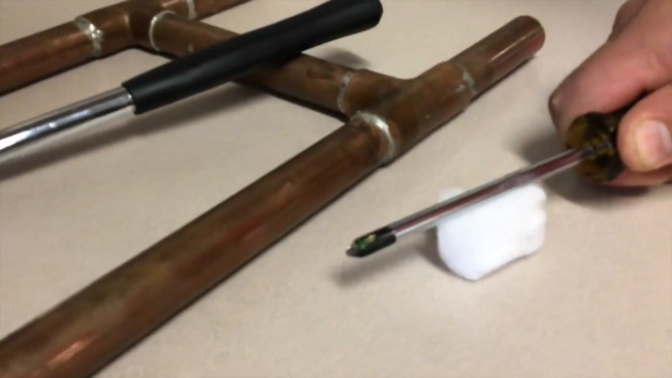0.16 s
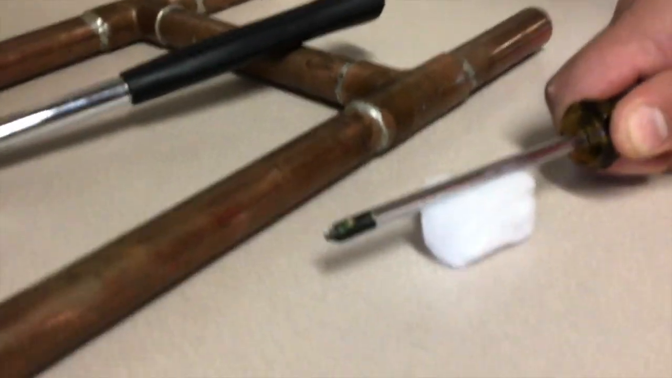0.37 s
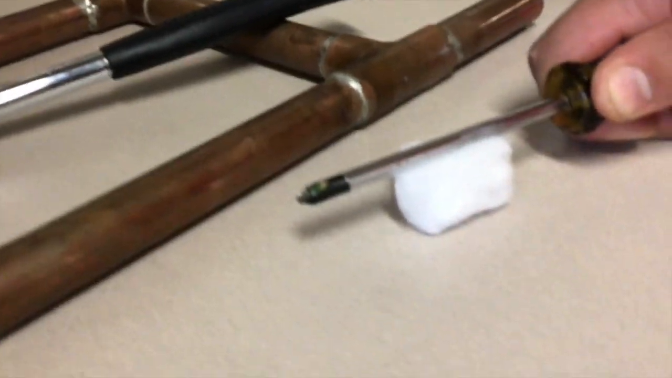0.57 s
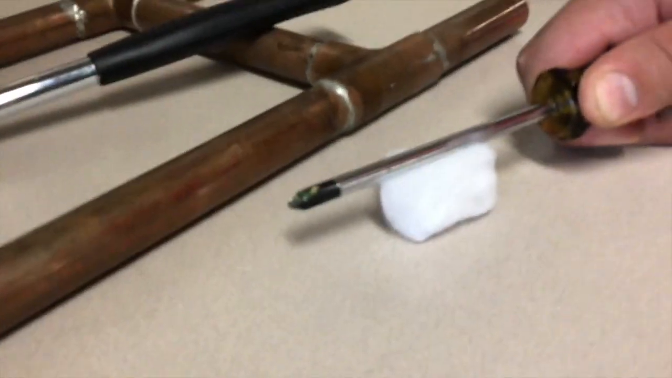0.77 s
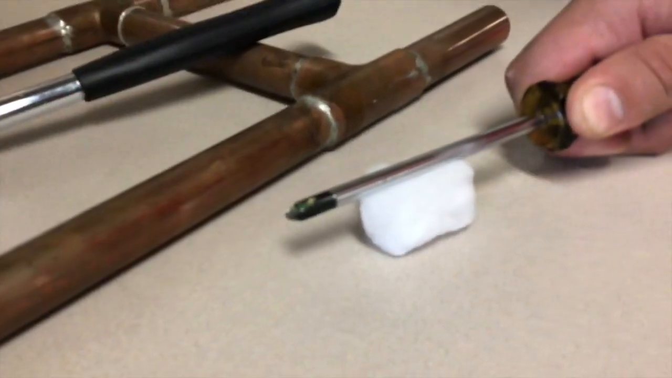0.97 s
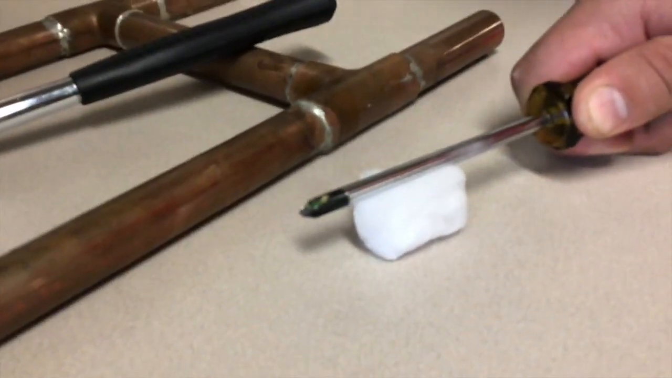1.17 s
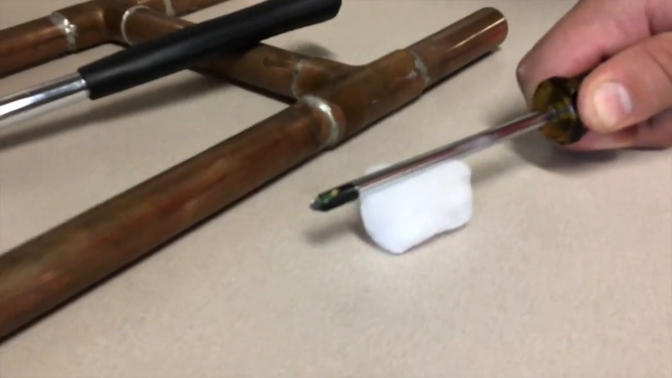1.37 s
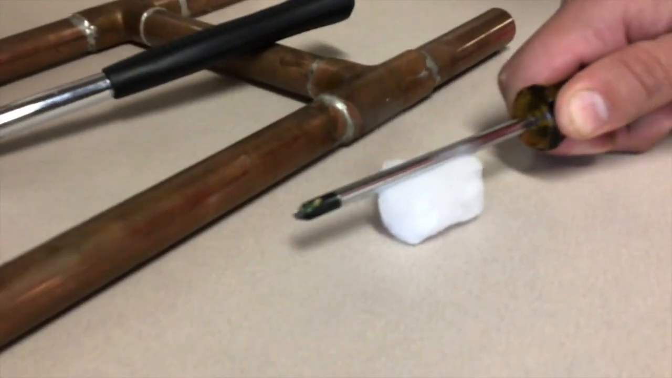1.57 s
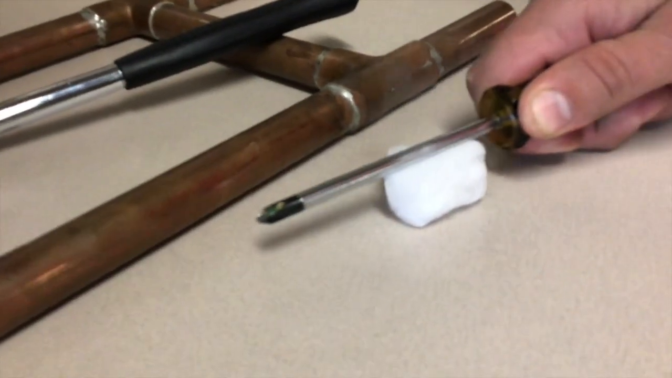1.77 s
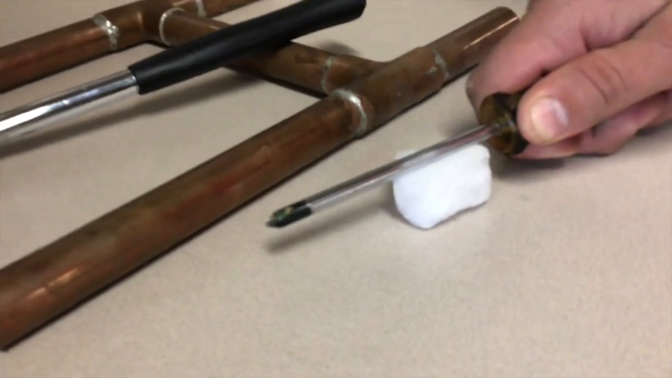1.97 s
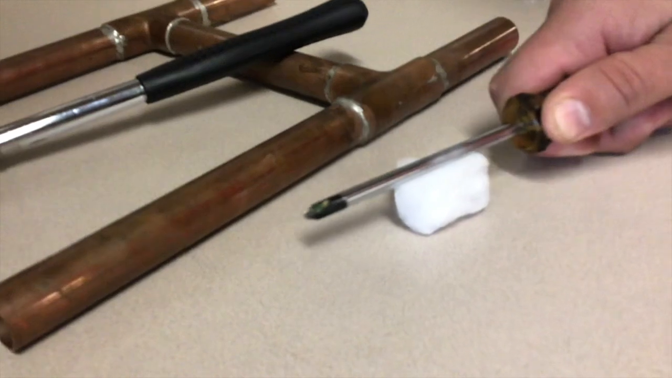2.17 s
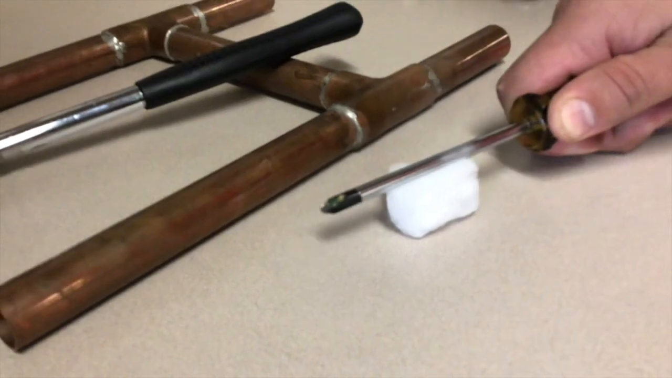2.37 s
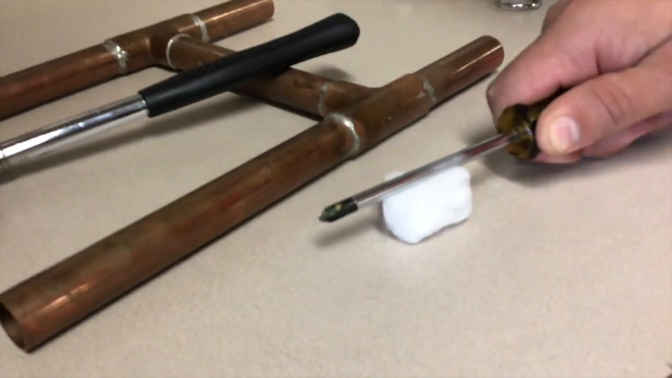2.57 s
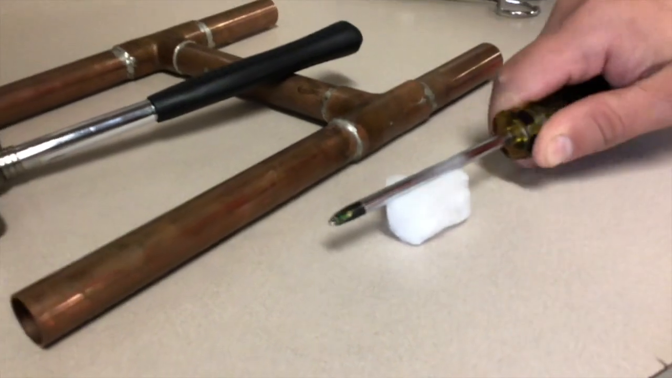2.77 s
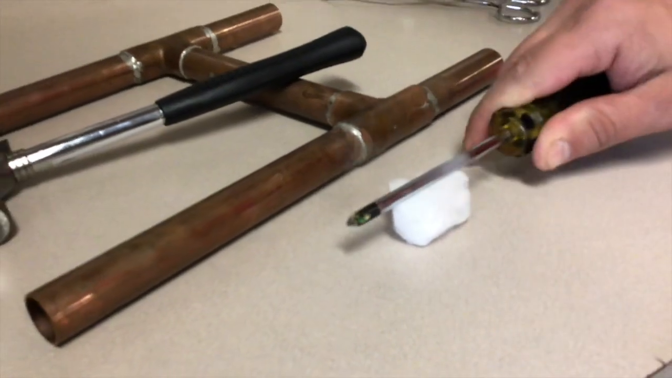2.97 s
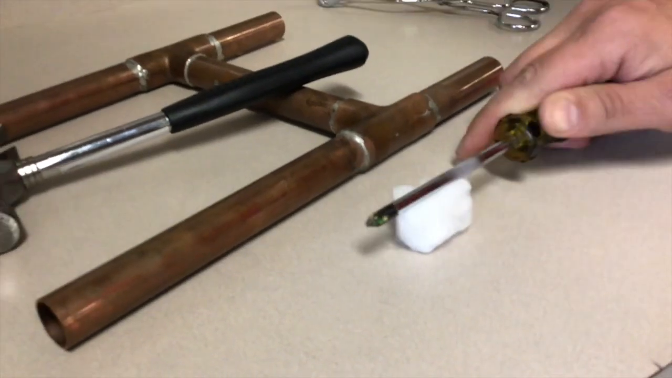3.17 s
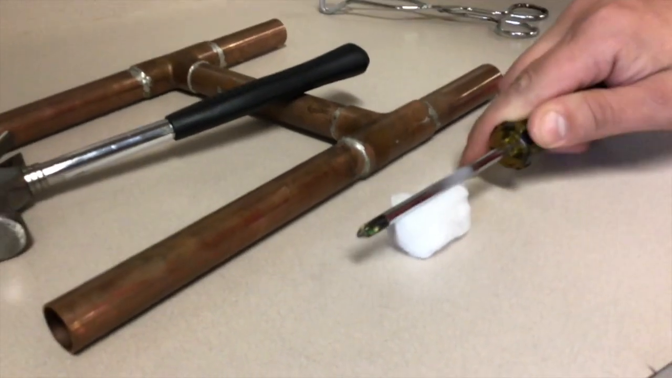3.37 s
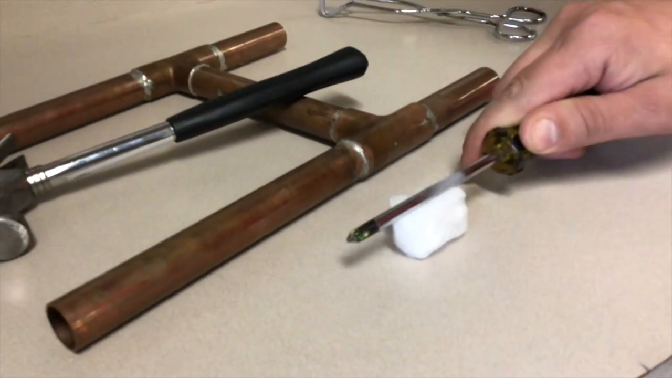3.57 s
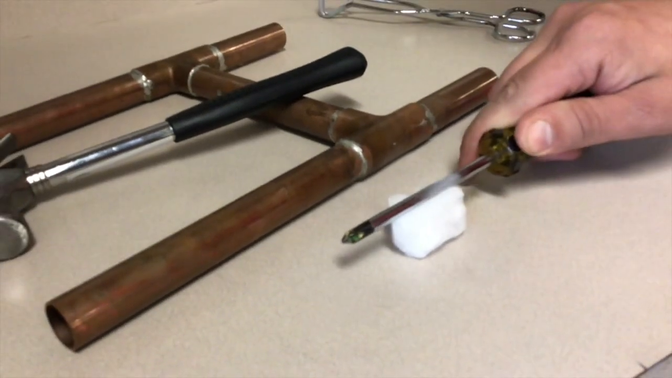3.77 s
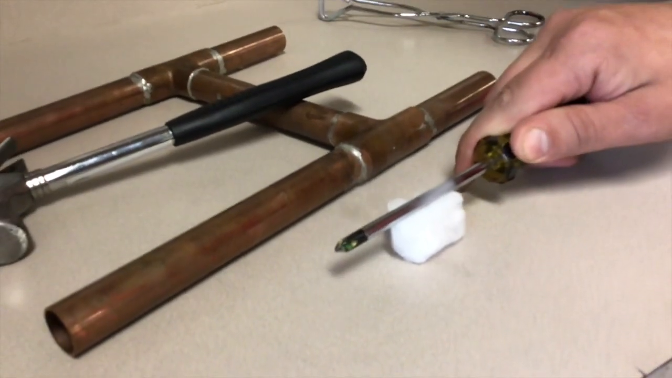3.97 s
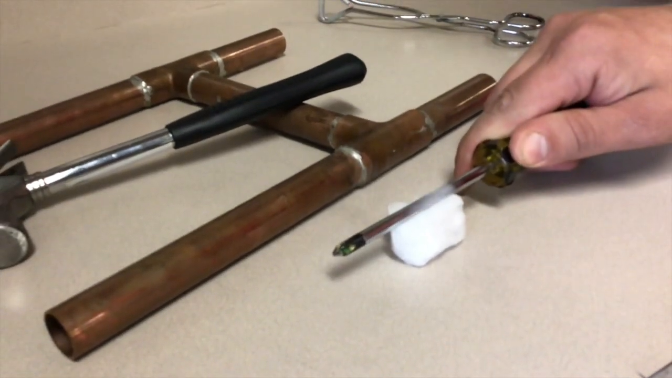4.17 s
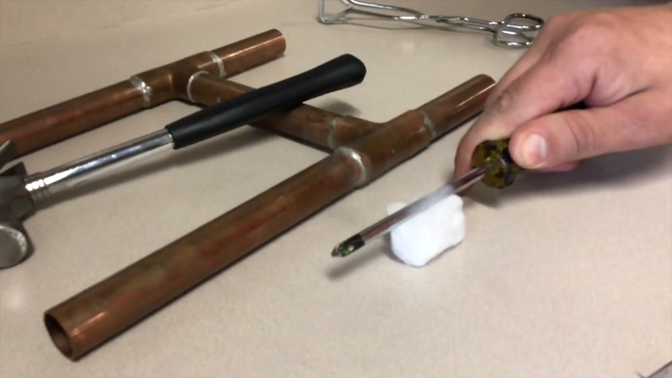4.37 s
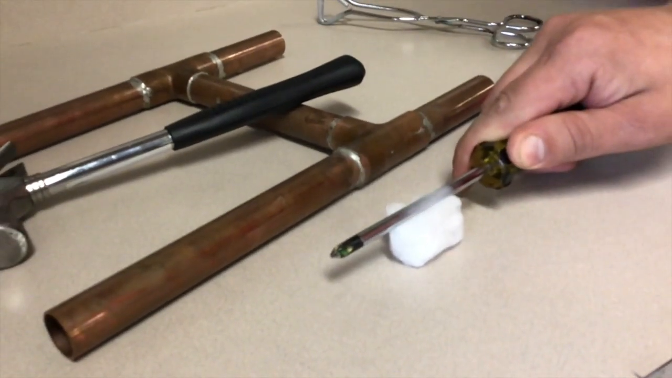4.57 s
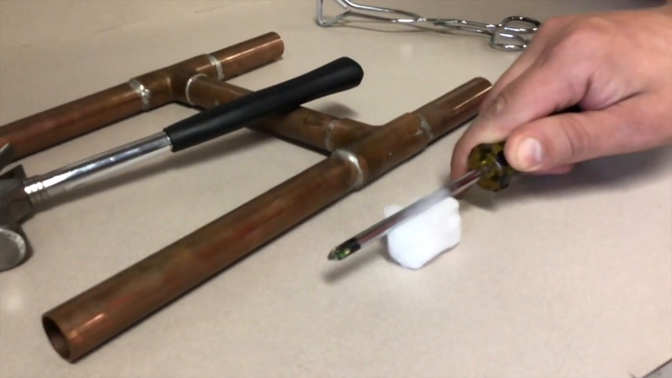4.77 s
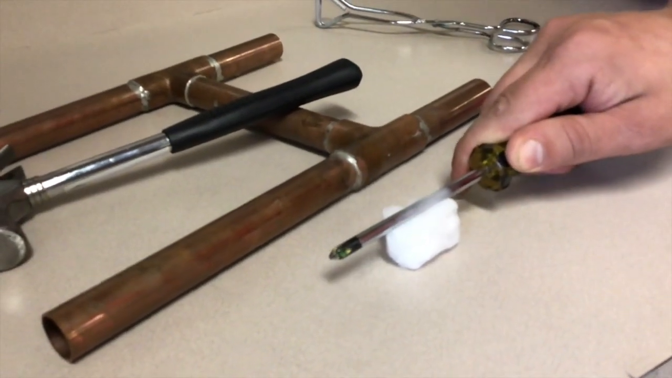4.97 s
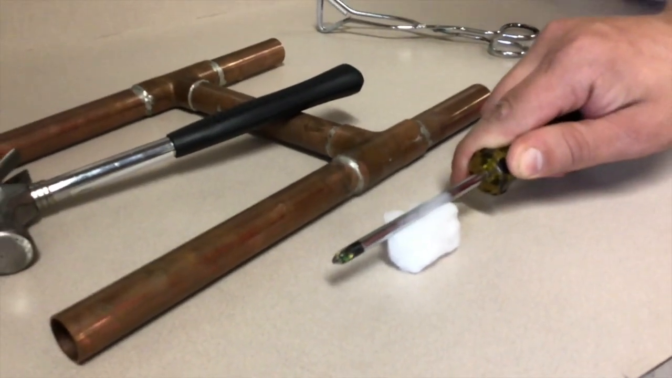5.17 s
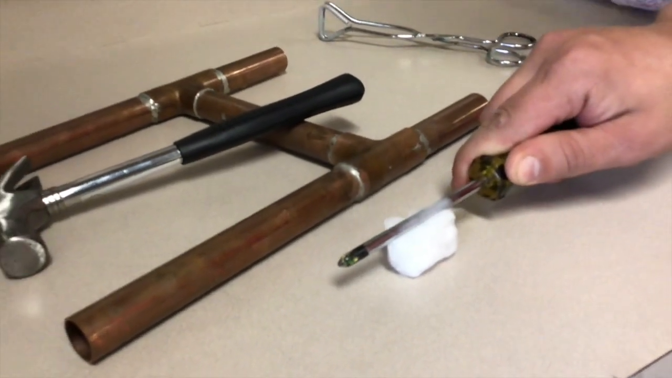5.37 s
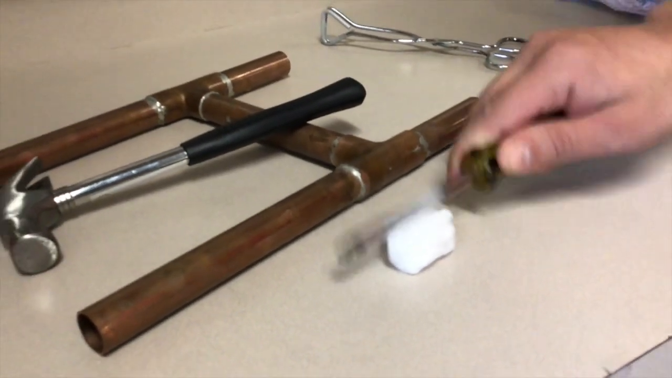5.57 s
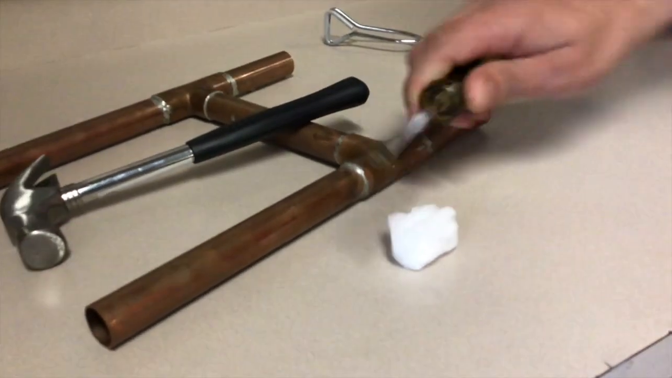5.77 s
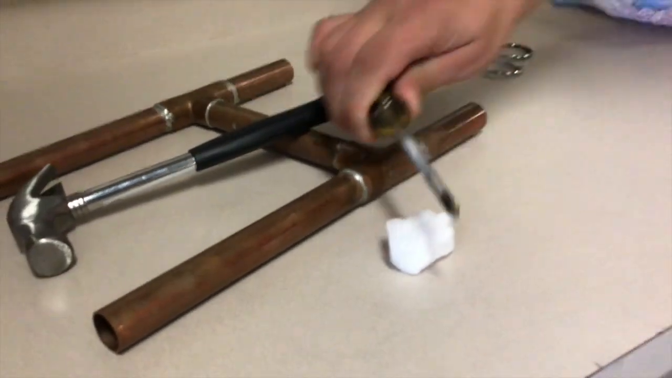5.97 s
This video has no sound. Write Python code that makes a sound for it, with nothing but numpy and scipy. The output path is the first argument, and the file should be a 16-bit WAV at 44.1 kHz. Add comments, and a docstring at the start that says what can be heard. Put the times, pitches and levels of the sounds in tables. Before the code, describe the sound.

A steel shaft pressed on dry ice starts squealing at once, a rough, buzzing screech that climbs, drops and swells in changing pitches. Midway it nearly fades, then returns harsh. Later it sings more purely, sinks to low groans with short squeaks, and ends with a small tick. Close microphone, a small hard-surfaced room, soft ventilation underneath.

```python
"""A screwdriver shaft is pressed on a block of dry ice on a classroom table, under soft ventilation noise.
At once the gas boiling off under the warm steel throws the shaft up hundreds of times a second or more:
one strike a cycle makes a gliding squeal where bounces are even and a rasp where they are uneven.
Purer, singing tones follow, then lower groans, short fresh touches with grinding, and a last tick.
Strikes are filtered pulses, the swing is a sine with overtones; table, steel and room ring after them."""
import sys
import numpy as np
from scipy import signal
from scipy.fft import rfft, irfft, next_fast_len
from scipy.io import wavfile
from scipy.ndimage import uniform_filter1d

SR = 44100
rng = np.random.default_rng(int(sys.argv[2]) if len(sys.argv) > 2 else 0)


def wav_out(sig):
    """Save sig, one row per channel (or a flat mono array), as 16-bit PCM at SR to the path in sys.argv[1]."""
    wavfile.write(sys.argv[1], SR, np.round(np.clip(np.atleast_2d(sig).T, -1, 1) * 32767).astype(np.int16))


N = 265076
TIME = np.arange(N) / SR  # [s]
USUAL_STRIKE_DB = -33.5  # reference level for the effects of strike strength


def amp(db):
    """Decibels to an amplitude ratio."""
    return 10 ** (np.asarray(db) / 20)


def unit(x):
    """Power normalisation: scales to rms 1."""
    return x / np.sqrt(np.mean(x ** 2) + 1e-20)


def curve(rows, column=1):
    """Linear interpolation: one column of a time table at every sample."""
    rows = np.array(rows)
    return np.interp(TIME, rows[:, 0], rows[:, column])


def read(points, hz):
    """Interpolates a spectrum on a logarithmic frequency axis."""
    f, value = np.transpose(points)
    return np.interp(np.log(hz + 1), np.log(f), value)


def wander(hz):
    """Low-pass filtered noise: slow chance up to about the given rate, rms 1."""
    size = 16384
    f = np.fft.rfftfreq(size, TIME[-1] / size)
    spectrum = rfft(rng.standard_normal(size)) / (1 + (f / hz) ** 4)
    return np.interp(TIME, np.linspace(0, TIME[-1], size), unit(irfft(spectrum)))


def colour(x, points, size=2048):
    """Minimum-phase filtering: the Hilbert transform of the log gain gives a causal response."""
    hz = abs(np.fft.fftfreq(size, 1 / SR))
    log_gain = np.log(amp(read(points, hz)))
    response = np.fft.ifft(np.exp(np.conj(signal.hilbert(log_gain)))).real
    return signal.oaconvolve(x, response[:size // 2])[:N]


def below(x, hz):
    """Zero-phase low-pass: the part of a sound under the given frequency."""
    size = next_fast_len(N, True)
    f = np.fft.rfftfreq(size, 1 / SR)
    return irfft(rfft(x, size) / (1 + (f / hz) ** 8), size)[:N]


def clicks(times, sizes):
    """Band-limited impulses: windowed sinc pulses at exact times between samples."""
    at = np.floor(times * SR).astype(int)[:, None] + np.arange(-7, 9)
    offset = at - times[:, None] * SR
    shape = np.sinc(offset) * np.sinc(offset / 8)
    return np.bincount(np.clip(at, 0, N - 1).ravel(), (sizes[:, None] * shape).ravel(), N)


def steadied(x, size=1300):
    """Running power normalisation: scales to a local rms of 1."""
    power = uniform_filter1d(uniform_filter1d(x ** 2, size), size)
    return x / np.sqrt(abs(power) + 1e-12)


def clatter(train, decay):
    """Decaying random vibration: each click starts noise that dies away, never twice the same."""
    keep = np.exp(-2 / (decay * SR))  # power decay; decay [s] is the amplitude time constant
    power = signal.lfilter([1 - keep], [1, -keep], train ** 2)
    return np.sqrt(power) * rng.standard_normal(N)


def ventilation(level_db=-71.5):
    """Broadband flow noise: random noise shaped by a smooth spectrum."""
    # ventilation spectrum: (frequency [Hz], relative level [dB per Hz])
    air_spectrum = [(28, -56), (60, -17), (119, -13), (337, -32), (15000, -60)]
    return amp(level_db) * unit(colour(rng.standard_normal(N), air_spectrum, size=8192))


def echoes(x, delay=.0087):
    """Reverberation: random reflections of energy 1, each band decaying exponentially at its own rate."""
    # reverberation of the room: (frequency [Hz], time to fall by 60 dB [s])
    room_decay = [(200, 0.78), (4000, 0.22), (12000, 0.31)]
    taps = rng.choice([-1., 1.], SR) * (rng.random(SR) < 1 / 8)
    hz, t, bands = signal.stft(taps, SR, nperseg=128)
    decay = amp(-60 * t / read(room_decay, hz)[:, None])
    tail = signal.istft(bands * decay, SR, nperseg=128)[1]
    silence = np.zeros(int(delay * SR))  # delay [s]
    tail = np.r_[silence, tail / np.linalg.norm(tail)]
    return signal.oaconvolve(x, tail)[:N]


def ringing(x, level_db=-30):
    """Modal resonance: bending modes of the table and the shaft, fed by the sound of every contact."""
    # table top (lowest row) and steel: (frequency [Hz], relative level [dB], time to fall by 60 dB [s])
    ring_modes = [(290, -17, .05), (1005, -45, .4), (1205, -30, .12), (4140, -47, .9), (4671, -44, .28)]
    t = TIME[:SR]
    modes = sum(amp(db - 60 * t / t60) * np.sin(2 * np.pi * hz * t) for hz, db, t60 in ring_modes)
    return amp(level_db) * signal.oaconvolve(x, modes)[:N]


def knocks(level_db=14):
    """Impact excitation: single hard contacts with a short clatter of the block on the table."""
    # the steel knocks on the block: (time [s], relative level [dB])
    contacts = [(2.335, -26), (3.802, -33), (5.581, -28)]
    times, db = np.transpose(contacts)
    hit = clicks(times, amp(db + level_db))
    spectrum = [(100, -14), (1600, -6.5), (4500, -10), (9000, -38.5), (15000, -40)]  # (Hz, dB)
    return colour(hit + amp(8) * clatter(hit, .012), spectrum)


def controls():
    """Onset and decay of oscillation: squeals catch fast and die away, and the strongest leads."""
    # long squeals from catching to letting go:
    # (time [s], mean pitch [Hz], nominal strike level [dB], roughness [0-1])
    rising, falling = [(0, 576.7, -25, 0.68), (.06, 668.7, -28, 0.77), (.42, 671.7, -27.5, 0.54),
                       (.72, 723, -29, 0.55), (.955, 875.7, -27, 0.55), (.985, 910, -31.5, 0.38),
                       (1.06, 949, -32.5, 0.07), (1.1, 1054, -40.5, .05), (1.162, 1005, -35.5, 0.02),
                       (1.21, 1097, -33, 0.26), (1.3, 1047, -32, 0.28)], [(1.335, 1156, -29, 0.52), (1.39, 1274, -29, 0.56),
                                       (1.55, 902, -29.5, 0.81), (1.761, 585, -28, 0.74),
                                       (1.85, 664, -33, .8), (2.034, 631.4, -33.5, 0.73),
                                       (2.079, 1219, -41.5, 0.57)]
    arching, swelling = [(2.141, 678.3, -50, 1), (2.204, 683.8, -38, 0.38), (2.28, 691, -38.5, 0.53),
                         (2.31, 703.7, -30.5, 0.39), (2.39, 781, -28, 0.495), (2.461, 739, -32.5, 0.52),
                         (2.56, 916.3, -34.5, 0.38), (2.611, 1061, -29.5, 0.35), (2.66, 1078, -36, 0.43),
                         (2.78, 1182, -31, .8), (2.945, 1142, -30, 1), (2.962, 592, -33.5, .8),
                         (3.095, 593.4, -41, 0.47), (3.14, 597, -63, 1)], [(3.182, 601.5, -37, 0.81), (3.28, 670.3, -27.5, 0.76),
                                          (3.389, 910, -27, 0.62), (3.425, 1076, -27, .42),
                                          (3.47, 944.4, -47.5, .3), (3.488, 1019, -36.5, 0.31),
                                          (3.539, 960, -38, 0.39), (3.587, 1147, -28, 0.36),
                                          (3.629, 974, -38, 0.3), (3.682, 761, -31.5, 0.39),
                                          (3.726, 892, -41.5, 0.076), (3.77, 836, -46.5, 0.077)]
    singing, groaning = [(3.804, 826, -41, 0.35), (3.842, 923.4, -39, 0.028), (3.946, 883, -49.5, 0.043),
                         (3.997, 946, -40.5, 0.063), (4.041, 880.4, -38, 0.29), (4.119, 860.4, -34, 0.25),
                         (4.145, 884, -34, 0.24), (4.176, 855, -33, 0.19), (4.259, 845.6, -34.5, 0.24),
                         (4.386, 905.3, -34.5, 0.15), (4.461, 877.6, -33, 0.12), (4.563, 851, -36, 0.2),
                         (4.613, 891.4, -47.5, 0.015), (4.66, 917, -42, 0.017), (4.685, 883, -34.5, 0.17),
                         (4.816, 920.3, -32, .17)], [(4.86, 495, -35, 0.51), (4.935, 441.2, -39, 0.36)]
    whining, grinding = [(4.968, 678.8, -56, .8), (5.11, 723.4, -68, .55)], [(5.15, 481.8, -32, .27), (5.24, 499.5, -31, 0.22),
                                          (5.274, 452, -58, 0.41), (5.359, 432, -58, .7)]
    # brief squeaks as the shaft is jolted or touches anew:
    # (start time [s], hold [s], mean pitch [Hz], nominal strike level [dB], roughness [0-1])
    short_squeaks = [(1.316, 0.014, 1104, -24, 0.66), (2.089, 0.032, 1319, -29.5, 0.04),
                     (4.828, 0.024, 873, -30, 0.35), (5.127, 0.017, 853.6, -25, 0.34),
                     (5.234, 0.0077, 916, -28.5, 0.6), (5.426, 0.019, 1031, -31, 0.5)]
    attack, release = 3003, 649.5  # [dB per s]

    tables = [rising, falling, arching, swelling, singing, groaning, whining, grinding]
    for start, hold, *rest in short_squeaks:
        tables.append([(start, *rest), (start + hold, *rest)])
    squeals = []
    for rows in tables:
        before = np.maximum(rows[0][0] - TIME, 0)
        after = np.maximum(TIME - rows[-1][0], 0)
        level_db = curve(rows, column=2) - attack * before - release * after
        squeals.append((curve(rows), level_db, curve(rows, column=-1)))
    hz, level_db, rough = np.swapaxes(squeals, 0, 1)
    leading = level_db.argmax(axis=0), np.arange(N)
    return hz[leading], np.maximum(level_db[leading], -150), np.clip(rough[leading], 0, 1)


def swing_turns(hz, rough, waver=.022, rock_depth=.02, rock_hz=70):
    """Frequency modulation, in cycles: pitch wavers, the shaft rocks on the block, rough bounces stumble."""
    rock = np.sin(2 * np.pi * np.cumsum(rock_hz * (1 + .2 * wander(20))) / SR)
    rocking = rock_depth * np.tanh((rough / .17) ** 2) * rock
    stumble = rough ** 3 * (.13 * wander(300) + .05 * wander(35))
    return np.cumsum(hz * (1 + waver * rough * wander(59.78) + rocking + stumble)) / SR


def flexing(flex_hz=297):
    """Phase modulation: the bending shaft hurries and delays its bounces, adding tones between harmonics."""
    # the shaft flexes end to end: (middle time [s], length [s], shift of the bounces [cycles])
    flex_spells = [(1.321, 0.29, 0.038), (4.19, 0.18, 0.03), (4.383, 0.12, .06)]
    depth = sum(shift * np.exp(-(2 * (TIME - middle) / length) ** 4)
                for middle, length, shift in flex_spells)
    return depth * np.sin(2 * np.pi * flex_hz * TIME)


def stalls(width, rate=30.5, keep=.95):
    """Amplitude modulation: depth in dB of short dips, which may repeat and grow shallower."""
    # the shaft nearly stalls and catches again, once or in a stutter:
    # (first stall time [s], length of the stutter [s], nominal depth of the first dip [dB])
    stutters = [(0.043, .52, 9.5), (2.192, .115, 26), (2.657, .01, 10)]
    t = np.arange(0, TIME[-1], .001)
    depth = np.zeros(len(t))
    for first, length, db in stutters:
        # rate [stalls per s]; each keeps this share of the depth of the one before
        for k, middle in enumerate(np.arange(first, first + length, 1 / rate)):
            depth += db * keep ** k * np.exp(-((t - middle) / width) ** 2)
    return np.interp(TIME, t, depth)


def scattered(x, feedback=.73, soft_hz=7000):
    """All-pass diffusion: quick reflections off the table top smear each click and keep its colour."""
    size = next_fast_len(N + SR, True)
    f = np.fft.rfftfreq(size, 1 / SR)
    spectrum = rfft(x, size)
    kept = feedback / (1 + (f / soft_hz) ** 2)
    for delay in np.geomspace(.0007, .0043, 4):  # [s]
        late = np.exp(-2j * np.pi * f * delay)
        spectrum = spectrum * (late - kept) / (1 - kept * late)
    return irfft(spectrum, size)[:N]


def bounces(turns, hz, rough, scatter=.309, uneven_db=11, clatter_db=-1, snap_db=-18):
    """Repeated impact: one click a cycle; rough ones land early or late, and also snap sharply."""
    # one bounce with the shaft lying flat, and after the hand has turned: (frequency [Hz], level [dB])
    flat_spectrum, turned_spectrum = [(50, -50.5), (170, -16.5), (340, -19), (450, -8), (750, -19),
                                      (1020, -16.5), (1230, 2), (1400, -10.5), (1530, 5), (1720, -2),
                                      (2020, 6), (2300, 0), (2480, 0.5), (4400, -1), (5400, -6),
                                      (7000, -20.5), (7900, -8.5), (10000, -27.5)], [(50, -55.5), (280, -12.5), (350, -17.5), (450, -11),
                                                    (1020, -2.5), (1550, 4.5), (2400, 5), (4700, -3.5),
                                                    (5350, 1.5), (7100, -9.5), (9000, -5.5), (10800, -12.5),
                                                    (12000, -21)]

    times = np.interp(np.arange(1, int(turns[-1])), turns, TIME)
    rough = np.interp(times, TIME, rough)
    late, hard, sharp = rng.standard_normal((len(times), 3)).T
    times = times + scatter * rough ** 2 * late * np.gradient(times)
    push = abs(np.gradient(times)) * np.interp(times, TIME, hz)  # a longer flight lands harder
    push = push * amp(uneven_db * rough * np.minimum(hard, 2))
    train = clicks(times, push) + amp(clatter_db) * clatter(clicks(times, push * rough), .0012)

    turned = curve([(3, .0081), (3.3, .29), (4.1, 1)])  # the hand tilts the shaft: (s, share)
    body = (1 - turned) * colour(train, flat_spectrum) + turned * colour(train, turned_spectrum)

    # some spots snap more: (s, relative dB)
    brittle_db = np.interp(times, TIME, curve([(.7, 18.9), (1.5, 11.93), (2.8, 8.3), (4.2, 17.9)]))
    spread_db = 4 * np.minimum(sharp, 1.4)
    snaps = clicks(times, push * np.tanh(2 * rough) * amp(brittle_db + spread_db))
    snap_spectrum = [(700, -41.5), (4500, 1), (7000, -8.5), (11700, -18.5), (13500, -14.5)]  # (Hz, dB)
    snaps = colour(clatter(snaps, .00067), snap_spectrum)
    return scattered(body) + amp(snap_db) * snaps


def weighted(strikes, hz, strike_db, rough, thud_hz=440, edge_hz=6500, graze=2.3):
    """Contact spectrum: fast bounces lose bass, weak ones lose treble; fast, even ones barely graze."""
    usual_hz, thud_per_db, dull_per_db = 840, 3, .5
    weight_db = 20 * np.log10(usual_hz / np.maximum(hz, usual_hz * .97))
    edge_db = dull_per_db * np.minimum(strike_db - USUAL_STRIKE_DB, 0)
    thud, body = below(strikes, thud_hz), below(strikes, edge_hz)
    bass_db = curve([(.3, 4.5), (1.6, -1.5), (2.3, 10), (5, 5)])  # (s, dB)
    shaped = amp(thud_per_db * weight_db + bass_db) * thud
    shaped = shaped + (body - thud) + amp(edge_db) * (strikes - body)
    return shaped * amp(graze * weight_db * (1 - rough) ** 6)


def swing_level(hz, strike_db, rough, lead_db=18):
    """Forced oscillation: level in dB of the swing, set by pitch, strike strength and roughness."""
    # how widely the shaft swings at each pitch: (frequency [Hz], base level [dB])
    swing_width = [(480, -49.5), (590, -34.5), (790, -33.5), (838, -37), (874, -29.5), (900, -32),
                   (935, -47.5), (1070, -44.5), (1180, -27), (1300, -46.5)]
    # landing afresh on the ice kicks the swing wider for a moment: (time [s], initial extra swing [dB])
    fresh_landings = [(5.423, 12.5)]
    follows, stumble_db, kick_s = .3, -13, .056  # kick_s is the time constant of a kick

    width_db = read(swing_width, hz) + follows * (strike_db - USUAL_STRIKE_DB)  # harder strikes widen it
    # a stumbling swing is drawn to a level this far under the strikes
    width_db = width_db + rough ** 2 * (strike_db + stumble_db - width_db)
    # only a smooth swing outlasts the strikes
    width_db = np.minimum(width_db, strike_db + lead_db * (1 - rough))
    for start, db in fresh_landings:
        width_db = width_db + db * (TIME > start) * np.exp(-abs(TIME - start) / kick_s)
    return width_db


def swing_overtones(turns, hz, rough, blur_db=-6):
    """Nonlinear stiffness: squeezed gas stiffens, giving the swing overtones that roughness weakens."""
    # how well the shaft radiates the overtones of its swing: (frequency [Hz], relative level [dB])
    radiation = [(1200, 7), (1400, -7), (1600, 4), (2120, -5), (3100, -2), (3700, -11.5), (5400, -6.5),
                 (6400, -21)]
    total = np.zeros(N)
    for k in range(2, 7):
        level_db = read(radiation, k * hz) + blur_db * rough * k + 8.5 * np.sqrt(rough) * wander(27)
        total += amp(level_db) * np.sin(2 * np.pi * k * turns)
    return steadied(total)


def squeal(flutter_db=.5, bounce_db=-3, stall_width=.0053, overtone_db=-2, overtone_rough_db=-9):
    """Self-sustained oscillation: the shaft swings on its gas cushion and strikes the block once a cycle."""
    hz, strike_db, rough = controls()
    even, flex = swing_turns(hz, rough), flexing()
    turns = even + flex
    strikes = steadied(bounces(turns, hz, rough))
    strikes = amp(bounce_db) * weighted(strikes, hz, strike_db, rough)

    flicker_db = rough * (4 * wander(40) + 3 * wander(150)) - 3.5 * rough ** 2
    swing = np.sqrt(2) * np.sin(2 * np.pi * even) * amp(flicker_db)
    swing = swing * np.minimum(hz / 560, 1) ** 2  # a thin shaft radiates slow swings poorly
    width = uniform_filter1d(amp(swing_level(hz, strike_db, rough)), size=128)
    overtones = amp(overtone_db + overtone_rough_db * rough) * swing_overtones(turns, hz, rough)
    split = 10 * flex * rough * np.sin(2 * np.pi * even)  # flexing splits a rough swing into several tones

    sound = amp(strike_db) * (strikes + overtones + split) + width * swing
    sound = sound + amp(-40.5) * flex  # the flexing itself hums
    dips_db = stalls(stall_width) * amp(2 * wander(11))  # width [s]; the depth varies by chance
    return sound * amp(flutter_db * rough * wander(38) - dips_db)


def scene():
    """Superposition: shaft and block close by, their ringing and room echoes, and soft ventilation."""
    near = squeal() + knocks()
    near = near + ringing(near)
    return (near + amp(-16) * echoes(near) + ventilation())[None]


def record(dry):
    """Band limitation: a linear-phase low-pass filter removes the highest treble."""
    edge_hz = 15850
    lowpass = signal.firwin(511, edge_hz, window=("kaiser", 9), fs=SR)
    return signal.oaconvolve(dry, lowpass[None], "same")


dry = scene()
out = record(dry)
wav_out(out)
```